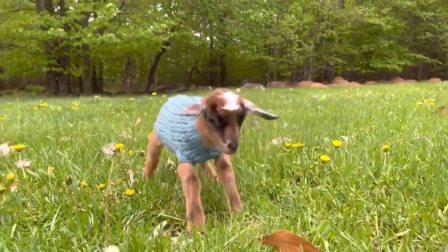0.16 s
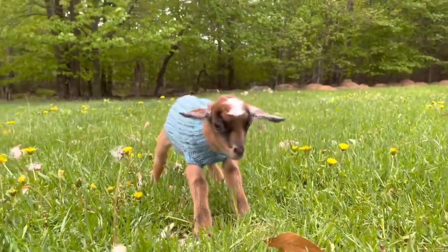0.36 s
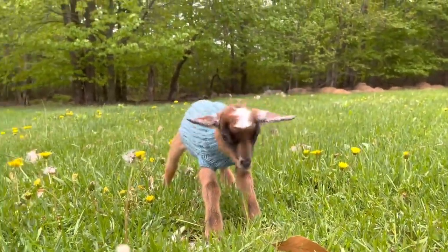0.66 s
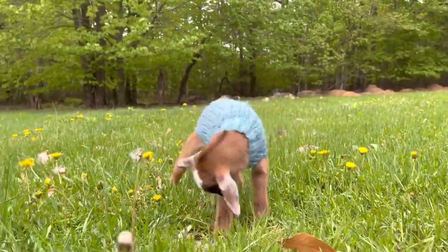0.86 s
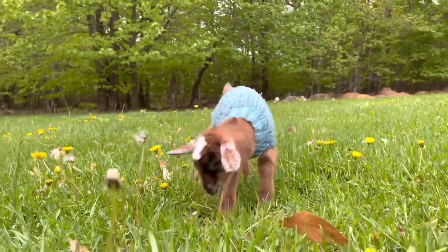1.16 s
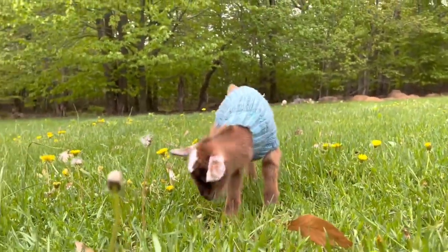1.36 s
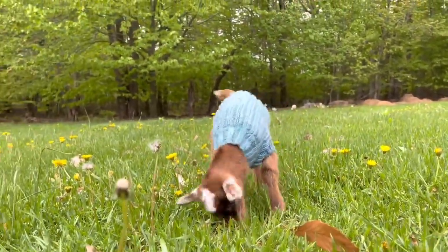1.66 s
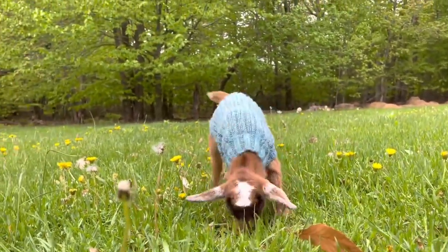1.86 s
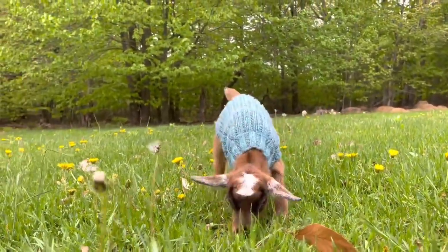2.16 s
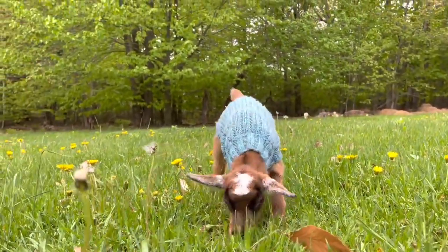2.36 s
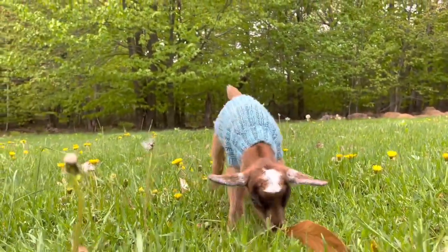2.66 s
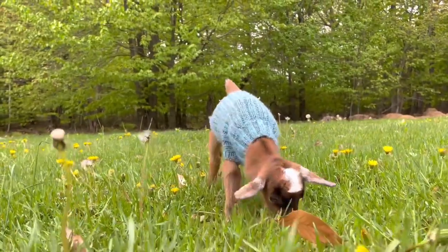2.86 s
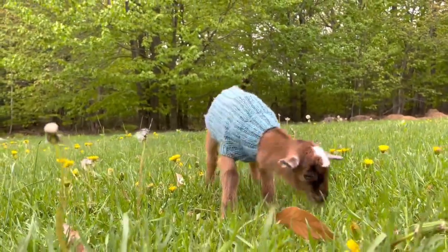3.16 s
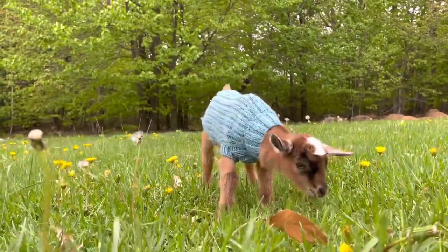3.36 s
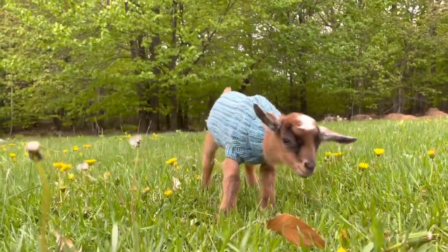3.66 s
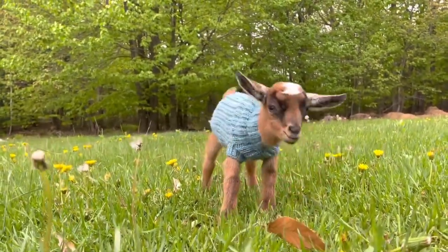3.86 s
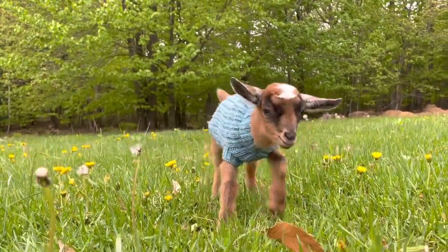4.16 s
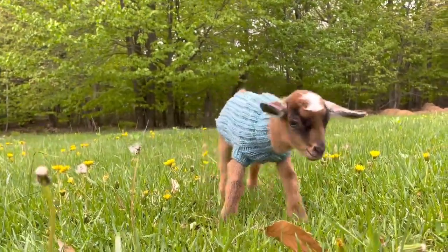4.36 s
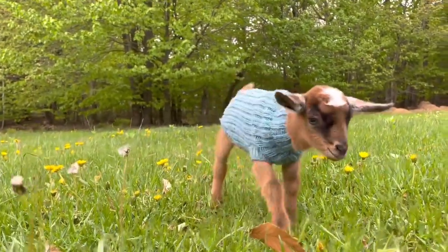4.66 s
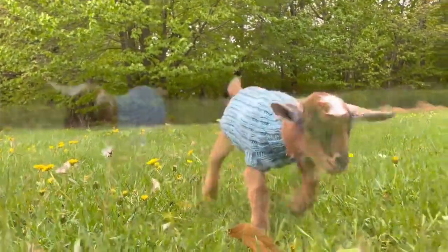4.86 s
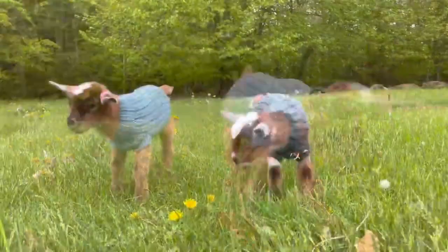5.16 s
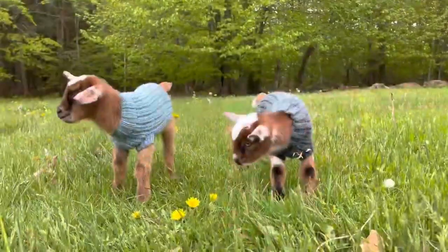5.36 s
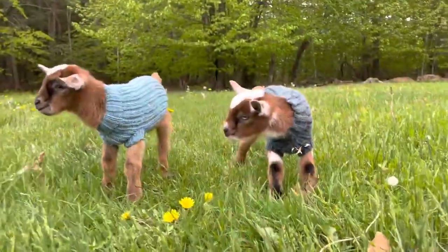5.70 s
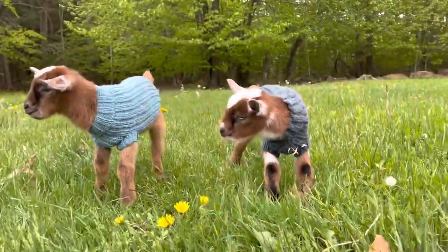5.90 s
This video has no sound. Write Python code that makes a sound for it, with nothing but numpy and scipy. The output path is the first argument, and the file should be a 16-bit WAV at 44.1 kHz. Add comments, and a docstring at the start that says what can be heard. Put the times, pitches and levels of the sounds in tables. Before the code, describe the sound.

A goat kid gives a small sneeze, then two quavering bleats, over soft grass rustle, distant birdsong and a faint low drone.

```python
"""A soft, thumping puff opens over a distant low drone: a newborn goat kid snuffles in a meadow.
Birds whistle at the wood's edge, grass ticks and rustles, and the kid sneezes through flapping nostrils.
It gives two close, quavering bleats, vocal-fold overtones shaped by a moving throat and roughened by
breath. Another kid holds a long, sagging call further off."""
import sys
import numpy as np
from scipy import signal
from scipy.fft import rfft, irfft, next_fast_len
from scipy.io import wavfile
from scipy.ndimage import uniform_filter1d, map_coordinates

SR = 44100
rng = np.random.default_rng(int(sys.argv[2]) if len(sys.argv) > 2 else 0)


def log_audio(samples):
    """Write samples as a 16-bit WAV file to the path given in sys.argv[1]."""
    # one column per channel
    frames = np.atleast_2d(samples).T
    # limit to full scale, then quantise
    limited = np.clip(frames, -1, 1)
    pcm = np.round(limited * 32767).astype(np.int16)
    wavfile.write(sys.argv[1], SR, pcm)


N = 266011
T = np.arange(N) / SR

# snuffles and brushed grass: t/s, rise/s, hold/s, level/dB, tilt/(dB/octave), thump gain/dB, thump f/Hz
PUFFS = [(0, 0.00035, .014, -39, 4, -36.5, 258), (.021, 0.0044, 0.067, -59.5, 3, -30, 88),
         (0.913, 0.0054, 0.027, -57.5, 3, -46, 200), (0.959, 0.019, 0.022, -57.5, 4, -56, 201),
         (2.051, .003, 0.027, -72.5, 2, -53, 650), (3.063, 0.00096, 0.084, -57.5, 2, -27, 183),
         (4.245, 0.0078, 0.016, -61, -0.5, -45, 354), (4.395, 0.0035, 0.021, -64.5, -0.5, -68, 410),
         (5.578, 0.031, .005, -50.5, 2.5, -54.5, 295), (5.616, 0.0024, 0.0055, -35, 2, -39, 703),
         (5.625, 0.0045, 0.016, -48, -0.5, -41, 337), (5.645, 0.0034, 0.0034, -41.5, 1, -54, 298),
         (5.704, 0.0047, 0.0066, -64, -3, -46.5, 418), (5.797, .012, 0.012, -56.5, 0, -43.5, 496)]
# colour of a puff before its tilt: f/Hz, level/dB
PUFF_SPECTRUM = [(240, -1), (400, 1), (796, -1.5), (860, 0.5), (1130, -2), (1470, -2), (4090, -9),
                 (8930, -9), (12300, -17.5), (13500, -36), (15500, -54)]
# fader rides for the drone and the grass hiss: t/s, level/dB
DRONE_RIDE = [(0, -43.5), (.15, -54.5), (2.0, -52.5), (3.1, -51), (4.1, -53.5), (4.89, -53.5), (5.19, -63),
              (5.5, -54), (5.6, -60), (6.03, -68)]
BREEZE_RIDE = [(.14, -82), (.27, -88.5), (.84, -88.5), (1.03, -78.5), (1.31, -82.5), (1.51, -88),
               (2.03, -81.5), (2.2, -85), (2.6, -85), (2.84, -76.5), (3.04, -81.5), (3.36, -88),
               (3.66, -77), (4.23, -69), (4.36, -70.5), (4.46, -86), (4.74, -67.5), (5.33, -69),
               (6.03, -64.5)]
# colours of grass hiss, leaf murmur and drone: f/Hz, level/dB
GRASS_SPECTRUM = [(1180, -9), (2000, -6), (2330, -4.5), (2670, -8.5), (3200, -6.5), (3440, -10.5),
                  (8980, -9), (10100, -14), (11500, -8), (13500, -87)]
LEAF_SPECTRUM = [(180, -4), (300, -4.5), (443, -7.5), (722, -7), (1850, -15.5), (2500, -32.5), (3250, -33),
                 (5500, -120)]
DRONE_SPECTRUM = [(12, -63), (20, -35.5), (57, 1), (107, 3), (159, -4.5), (188, -7.5), (220, -12.5),
                  (254, -15.5), (450, -25.5), (580, -35), (990, -120)]
# stereo image of the noise beds: f/Hz, left-right correlation
BED_CORRELATION = [(30, 0.8), (60, 1), (180, 0.85), (550, 0.26), (1650, -0.11), (4970, 0.55),
                   (15000, -0.54)]
# faint tones in the drone, perhaps a far engine: start t/s, end t/s, start f/Hz, end f/Hz, gain/dB
DRONE_TONES = [(0, 0.803, 178, 177.8, -69.5), (1.04, 1.4, 318, 321, -78.5),
               (2.138, 3.155, 213.5, 228.5, -64.5), (3.215, 3.85, 318, 324.4, -74.5),
               (3.284, 3.942, 358, 387, -72.5)]
# a far warbler: t/s, length/s, starting level/dB, f/Hz, warble depth/Hz
TRILLS = [(0, .62, -64, 2526, 236), (1.176, 0.72, -66, 2428, 71.2)]
# notes of three birds: t/s, length/s, start f/Hz, end f/Hz, gain/dB, left-right/dB
SLIDES = [(1.019, 0.056, 5530, 3360, -70, 4), (1.05, 0.049, 3150, 1920, -80.5, -17),
          (1.128, 0.055, 5030, 3670, -72.5, 0), (1.237, 0.057, 4870, 3430, -71, 2),
          (2.147, 0.049, 4590, 3040, -74.5, 8), (2.409, .05, 4960, 3390, -72, 12),
          (3.216, .053, 5440, 3480, -74, 12), (3.322, .054, 4930, 3430, -69.5, 11.5),
          (3.44, 0.06, 4850, 3560, -76.5, 13.5), (4.474, .042, 4920, 3400, -77.5, 8.5)]
DIVES = [(2.289, .058, 8360, 3790, -67, 7), (4.361, .044, 7130, 3670, -70.5, 12)]
CHIPS = [(.507, .038, 3370, 3220, -86, -10), (.588, 0.02, 3380, 3050, -73.5, -10),
         (1.129, 0.039, 3253, 3170, -72, -7), (1.639, 0.024, 3280, 3210, -81, -7),
         (1.712, .028, 3415, 3100, -71, -7)]
# pitch contours of slides, dives and chips: share held at the top, exponent of the fall
NOTE_SHAPES = [(.27, 1.05), (0.017, .85), (0.23, 1.15)]
# snapping grass stems: t/s, peak level/dB before panning, f/Hz, left-right/dB
STEM_TICKS = [(0.164, -53.5, 8800, 5), (2.369, -35, 4730, 3.5), (2.7806, -47.5, 11000, 7),
              (2.7935, -50, 7460, 8), (3.2424, -55, 4720, 11), (5.6189, -30, 8530, 3),
              (5.6224, -33, 8650, 6), (5.6307, -37, 8760, 1.5), (5.639, -39, 8610, 4),
              (5.678, -45, 5820, 6)]
# course of the sneeze: t/s, flap rate/Hz, whistle level/dB, thrum level/dB
SNEEZE = [(.85, 176, -72, -70), (.864, 237, -60, -63), (.878, 200, -43, -54), (.886, 335, -49, -42),
          (.892, 470, -40.5, -42.5), (.9, 453, -41, -34), (.916, 427, -46, -42), (.923, 375, -55, -49),
          (.935, 650, -78, -70)]
# a list per voiced phrase (first bleat, short pickup, second bleat), a row per quaver:
# trough t/s, f/Hz, level/dB, mouth opening; crest t/s, f/Hz, level/dB, mouth opening;
# pitch hold before the crest/s, hold after/s, mouth surge/dB, nose/dB, breath/dB
QUAVERS = [
    [(3.690, 441.4, -49.5, -0.83, 3.727, 636.6, -42, 0.85, 0.0011, 0.0027, 3.4, -9.5, -7.5),
     (3.806, 495, -72, 0.63, 3.847, 650, -39.5, 0.52, .015, .012, 8, -11, -16.5),
     (3.902, 461.5, -60, 0.65, 3.951, 672.5, -40.5, 0.48, 0.019, 0.015, 9.4, -15.5, -4),
     (3.997, 517.4, -54.5, 0.47, 4.046, 678.5, -36.5, 0.2, 0.013, 0.013, 5.6, -27, -17),
     (4.113, 406, -58, 0.37, 4.155, 515, -50, 0.3, 0.02, 0.0055, 1, -14.5, 0.5)],
    [(4.863, 568, -50.5, 0.28, 4.88, 589, -44, 0.34, 0.0029, .003, 0.36, -13.5, -1.5)],
    [(4.968, 630, -57.5, 0.48, 4.995, 670, -37, 0.067, 0.0173, 0.01005, 10.4, -16.5, -19.5),
     (5.041, 556.7, -48, .5, 5.081, 682.6, -37, 0.37, .019, 0.013, 9.7, -25, -19),
     (5.137, 515, -50.5, 0.61, 5.17, 662, -41, 0.56, .011, 0.011, 2, -33, -8),
     (5.224, 511, -54.5, 0.53, 5.252, 618, -46.5, 0.64, 0.0055, 0.0048, 0.43, -31, -8)],
]
# closing trough of each phrase: t/s, f/Hz, level/dB, mouth opening
PHRASE_ENDS = [(4.214, 402, -67.5, 0.18), (4.922, 432, -65, 0.47), (5.31, 446, -69.5, 0.45)]
# moving resonances of each phrase: t/s, middle f/Hz, gain/dB, upper f/Hz, gain/dB
VOWELS = [
    [(3.69, 3800, -4.5, 5800, -19.5), (3.728, 4480, 1.5, 6300, -6), (3.778, 5430, 14.5, 6350, 4.5),
     (3.815, 4940, 3, 5850, -4), (3.832, 5000, 9, 5900, 8), (3.845, 4950, 10, 5900, 8.5),
     (3.87, 4880, 11, 7400, 8), (3.93, 5130, 11, 6770, 7), (3.955, 4690, 13.5, 6670, 5),
     (3.961, 3870, -3, 6650, 0.5), (3.975, 4300, -3.5, 6550, 7.5), (4.0, 3880, 4, 5800, 4.5),
     (4.035, 4180, 2.5, 5370, -4), (4.078, 4070, 6, 5930, 4), (4.115, 4550, -14, 5970, -26),
     (4.14, 4550, -0.5, 6100, -14.5), (4.165, 4440, -3, 6080, -13.5), (4.19, 5190, 7.5, 6000, -2),
     (4.21, 5100, -17, 6250, -3)],
    [(4.86, 3680, 3.5, 5970, -15), (4.885, 3640, -1, 5970, -19), (4.915, 3850, -13, 6000, -22)],
    [(4.96, 4000, 0, 5850, -6), (4.995, 4130, 9.5, 5780, 14.5), (5.012, 3900, 10.5, 6300, 14.5),
     (5.045, 4100, 0.5, 5950, 6), (5.082, 4090, 14.5, 5920, 11), (5.105, 4100, 7, 6230, 9),
     (5.128, 4300, 3.5, 6230, 4), (5.15, 4330, -2, 6130, 6.5), (5.182, 4020, 9.5, 6340, 7),
     (5.208, 4500, -5, 6600, 3), (5.225, 4330, 2, 6200, 2), (5.255, 4350, -2, 6350, 1)],
]
# throat resonances that stay put: f/Hz, width/Hz, relative gain/dB
THROAT = [(2650, 1880, -4), (8720, 1000, -6), (10970, 310, -14.5)]
# side signal of a close voice between two microphone ports: f/Hz, level/dB
CLOSE_SIDE_SPECTRUM = [(400, -28), (1300, -10), (4400, -17.5), (8500, -4.5)]
# timbre of the far kid: harmonic number, relative level/dB
FAR_HARMONICS = [(1, -35), (2, 8.5), (3, -7), (4, 0), (5, 1), (6, -3.5), (7, 2.5), (8, 3), (9, -1),
                 (10, -4.5), (11, -28)]


def amp(db):
    return 10 ** (np.asarray(db) / 20)


def unit_rms(x):
    return x / np.sqrt(np.mean(x ** 2) + 1e-20)


def along(points, hz):
    """Read a curve on a log frequency axis."""
    f, values = np.transpose(points)
    return np.interp(np.log(hz + 1), np.log(f + 1), values)


def curves(rows, t=T, smooth=1):
    """One automation lane for each column after the time."""
    times, *columns = np.transpose(rows)
    return [uniform_filter1d(np.interp(t, times, c), size=smooth) for c in columns]


def wobble(rate):
    """A smooth random curve, rate knots a second."""
    return map_coordinates(rng.standard_normal(int(N * rate / SR) + 4), [T * rate])


def filtered(x, response):
    """EQ with a complex response of frequency."""
    size = next_fast_len(x.shape[-1] + 8192)
    return irfft(rfft(x, size) * response(np.fft.rfftfreq(size, 1 / SR)), size)[..., :x.shape[-1]]


def peak(f, hz, width):
    """One resonance, gain 1 at its centre."""
    return 1j * f * width / (hz * hz - f * f + 1j * f * width + 1e-9)


def panned(x, lr_db):
    return x * amp([[lr_db / 2], [-lr_db / 2]])


def scatter(x, t60, delay):
    """The diffuse stereo tail that trees or ground send back."""
    t = np.arange(SR) / SR
    tail = rng.standard_normal((2, SR)) * amp(-60 * t / t60) * (t > delay)
    return signal.fftconvolve(x[None], tail / np.linalg.norm(tail[0]), axes=1)[:, :N]


def noise_bed(spectrum, patchy_db):
    """Stereo noise of rms 1, mottled in time and frequency."""
    bins = signal.stft(rng.standard_normal((2, N)), nperseg=512)[2]
    patches = uniform_filter1d(rng.standard_normal(bins.shape[1:]), size=6, axis=0)
    patches = unit_rms(uniform_filter1d(patches, size=10, axis=1))
    pair = signal.istft(bins * amp(patchy_db * patches), nperseg=512)[1][:, :N]
    spread = lambda f: np.arccos(np.clip(along(BED_CORRELATION, f), -1, 1)) / 2
    mid, side = filtered(pair, lambda f: amp(along(spectrum, f)) * [np.cos(spread(f)), np.sin(spread(f))])
    return unit_rms(np.array([mid + side, mid - side]))


def puffs(longest_fall_s=0.034):
    """Breath and brushed grass: short gusts of grainy noise, each with a soft thump on the attack."""
    out = np.zeros((2, N + SR))
    t = np.arange(SR // 4) / SR
    for start, rise, hold, db, tilt_db, thump_db, thump_hz in PUFFS:
        attack = np.clip(t / rise, 0, 1) ** 2
        release = np.exp(-2 * np.clip(t - rise - hold, 0, 1) / min(hold, longest_fall_s))
        mid, side, grain = rng.standard_normal((3, len(t)))
        grain_db = 2.5 * unit_rms(uniform_filter1d(grain, size=60))
        air = np.array([mid + 0.76 * side, mid - 0.41 * side]) * amp(grain_db)
        colour = lambda f: amp(along(PUFF_SPECTRUM, f) + tilt_db * np.log2(f / 4000 + .01))
        gust = attack * release * unit_rms(filtered(air, colour))
        cycles = thump_hz * (t + 0.0013 * (1 - np.exp(-t / 0.0079)))  # starts a little sharp
        thump = t / 0.014 * np.exp(1 - t / 0.004) * np.sin(2 * np.pi * cycles)
        out[:, int(start * SR):][:, :len(t)] += amp(db) * gust + amp(thump_db) * thump
    return out[:, :N]


def meadow():
    """The bed: grass hiss and leaf murmur ride the breeze above a distant low drone."""
    breeze_db, = curves(BREEZE_RIDE)
    drone_db, = curves(DRONE_RIDE)
    leaves_db = -74 + 0.34 * (breeze_db + 82)  # leaves follow about a third of each swing
    grass = amp(breeze_db + 4.5 + 1.6 * wobble(21)) * noise_bed(GRASS_SPECTRUM, patchy_db=4.0)
    leaves = amp(leaves_db + 1.5 * wobble(4.3)) * noise_bed(LEAF_SPECTRUM, patchy_db=1.5)
    drone = amp(drone_db + 1.32 * wobble(7)) * noise_bed(DRONE_SPECTRUM, patchy_db=0.27)
    return grass + leaves + panned(drone, -1.1)


def drone_tones():
    """Thin, slightly unsteady hums that swell and fade inside the drone."""
    out = np.zeros(N)
    for start, end, start_hz, end_hz, db in DRONE_TONES:
        progress = np.clip((T - start) / (end - start), 0, 1)
        hz = start_hz + (end_hz - start_hz) * progress + 1.5 * wobble(21)
        swell = np.sqrt(abs(np.sin(np.pi * progress))) * (progress < 1)
        out += amp(db + 3.5 + 1.5 * wobble(6.5)) * swell * np.sin(2 * np.pi * np.cumsum(hz) / SR)
    return out


def birds(trill_fade_db_per_s=34):
    """Fading trills, and whistles that linger at the top, then slide down; the wood smears them."""
    whistles = np.zeros((2, N))
    for notes, (held, bend) in zip((SLIDES, DIVES, CHIPS), NOTE_SHAPES):
        for start, length, start_hz, end_hz, db, lr_db in notes:
            progress = np.arange(int(length * SR)) / (length * SR)
            fall = (np.clip(progress - held, 0, 1) / (1 - held)) ** bend
            hz = uniform_filter1d(start_hz * (end_hz / start_hz) ** fall, size=300, mode="nearest")
            envelope = np.sin(np.pi * progress) ** 0.44 * amp(db + 3.5 + 4.6 * wobble(138)[:len(hz)])
            note = envelope * np.sin(2 * np.pi * np.cumsum(hz) / SR)
            whistles[:, int(start * SR):][:, :len(note)] += panned(note, lr_db)
    trill = np.zeros(N)
    for start, length, db, hz, warble_hz in TRILLS:
        gate = (T >= start) * (T < start + length)
        level = amp(db - trill_fade_db_per_s * (T - start) + 0.93 * wobble(36.4))
        trill += gate * level * np.sin(2 * np.pi * np.cumsum(hz + warble_hz * wobble(60)) / SR)
    echo = amp(-2.5) * scatter(whistles.mean(axis=0), t60=0.96, delay=0.02)
    return whistles + echo + scatter(trill, t60=0.47, delay=0)


def stem_ticks(t60=0.0019):
    """Grass stems snap: a tiny noise burst rings for a few bright cycles."""
    out = np.zeros((2, N + SR))
    t = np.arange(400) / SR
    for start, db, hz, lr_db in STEM_TICKS:
        burst = rng.standard_normal(len(t)) * amp(-60 * t / t60)
        snap = filtered(burst, lambda f: peak(f, hz, 0.32 * hz) ** 2 * (f < 12500))
        out[:, int(start * SR):][:, :len(t)] += panned(amp(db) * snap / abs(snap).max(), lr_db)
    return out[:, :N]


def sneeze(nostril_hz=2970, climb_hz_per_s=26000, blast_s=.916, blast_db=-47.5):
    """The nostrils flap, gathering speed: each spurt of air rings the nose and pushes a low thrum."""
    start, end = SNEEZE[0][0], SNEEZE[-1][0]
    span = slice(int(start * SR), int(end * SR))
    t = T[span]
    flap_hz, whistle_db, thrum_db = curves(SNEEZE, t)
    nose_hz = nostril_hz + climb_hz_per_s * (np.minimum(t, blast_s) - start)  # the nostrils narrow
    flaps = np.cumsum(flap_hz * (1 + 0.033 * wobble(300)[span])) / SR
    since_flap = flaps % 1 / flap_hz
    spurt = amp(2 * rng.standard_normal(99))[flaps.astype(int)] * amp(-60 * since_flap / .006)
    nose_air, hiss_air = rng.standard_normal((2, len(t)))
    ring = spurt * (np.sin(2 * np.pi * nose_hz * since_flap) + .9 * nose_air)
    nose_eq = lambda f: peak(f, 2940, 1000) * peak(f, 4230, 2000) * peak(f, 2100, 2900)
    whistle = unit_rms(filtered(ring, nose_eq))
    phase = 2 * np.pi * flaps
    thrum = np.sin(phase) + 0.31 * np.sin(2 * phase + 1) + 0.095 * np.sin(phase / 2)
    hiss_eq = lambda f: (peak(f, 8700, 1500) ** 2 + 0.17 * peak(f, 6400, 5000)) * (f < 12300)
    hiss = unit_rms(filtered(hiss_air * (0.71 + spurt), hiss_eq))
    hiss_db = blast_db + np.minimum(635 * (t - blast_s), 2600 * (blast_s - t))  # builds, then cuts off
    flutter_db = 2.5 * wobble(200)[span]
    out = np.zeros(N)
    out[span] = amp(whistle_db) * whistle + amp(thrum_db + flutter_db) * thrum + amp(hiss_db) * hiss
    return out


def quavering(quavers, end, t, longest_glide_s=0.05, surge_s=0.0087, creep_hz_per_s=480):
    """Automation for the bleat: each quaver arches from a slack trough to a taut crest and back."""
    columns = np.transpose(quavers)
    slack_s, slack_hz, slack_db, slack_mouth = np.c_[columns[:len(end)], end]
    crest_s, crest_hz, crest_db, crest_mouth, hold_before, hold_after, *timbre = columns[len(end):]
    crest = np.clip(np.searchsorted(slack_s, t, side="right") - 1, 0, len(crest_s) - 1)
    since = t - crest_s[crest]
    falling = since > 0
    trough = crest + falling
    span = abs(slack_s[trough] - crest_s[crest])
    held = np.where(falling, hold_after[crest], hold_before[crest])
    away = np.clip(abs(since) / span, 0, 1)  # 0 at the crest, 1 in the trough
    glide = np.clip((abs(since) - held) / np.minimum(span - held, longest_glide_s), 0, 1)
    surge_db, nose_db, breath_db = (np.interp(t, crest_s, c) for c in timbre)
    surge_db = surge_db * np.exp(-(since / surge_s) ** 2)
    nose_db = nose_db + 7 * away  # the troughs turn nasal
    taut_hz = crest_hz[crest] + creep_hz_per_s * since - 3.5 * surge_db  # gives a little in the surge
    pitch = taut_hz + (slack_hz[trough] - taut_hz) * np.sin(np.pi / 2 * glide) ** 1.5
    db = crest_db[crest] + (slack_db[trough] - crest_db[crest]) * away ** np.where(falling, 1.25, 1.73)
    mouth = crest_mouth[crest] + (slack_mouth[trough] - crest_mouth[crest]) * away
    return uniform_filter1d([pitch, db, surge_db, nose_db, mouth, breath_db], size=7, axis=1)


def vocal_tract(f, t, vowel, mouth, surge_db):
    """Throat and mouth resonances; a wider mouth lifts the lowest from harmonic two to three."""
    middle_hz, middle_db, upper_hz, upper_db = curves(vowel, t, smooth=11)
    (throat_hz, throat_width, throat_db), *treble = THROAT
    band = peak(f, 1150 + 950 * np.clip(mouth, -.5, 1), 750) ** 2
    band -= amp(throat_db) * peak(f, throat_hz, throat_width) ** 2
    tract = amp(surge_db) * band / np.sqrt(np.sum(abs(band) ** 2, axis=0))
    tract += amp(middle_db) * peak(f, middle_hz, 740) ** 2 - amp(upper_db) * peak(f, upper_hz, 1000) ** 2
    tract += sum(amp(db + upper_db) * peak(f, hz, width) ** 2 for hz, width, db in treble)
    return tract * (1 - 0.58 * peak(f, 3320, 500))  # the nasal passage swallows a narrow band


def bleats(lead_in_s=.009, fade_s=0.0037, step=32):
    """Vocal-fold overtones pass through the moving throat; breath blurs the upper ones."""
    out = np.zeros(N)
    harmonic = np.arange(1, 25)[:, None]
    to_audio_rate = lambda x: uniform_filter1d(np.repeat(x, step, axis=-1), size=step, axis=-1)
    for quavers, end, vowel in zip(QUAVERS, PHRASE_ENDS, VOWELS):
        first, last = int((quavers[0][0] - lead_in_s) * SR), int(end[0] * SR)
        t = T[first:last:step]
        pitch, db, surge_db, nose_db, mouth, breath_db = quavering(quavers, end, t)
        f = harmonic * pitch
        partials = vocal_tract(f, t, vowel, mouth, surge_db)
        partials[0] = amp(nose_db)  # the nose carries the fundamental
        air = rng.standard_normal(f.shape) + 1j * rng.standard_normal(f.shape)
        leak_db = .055 * (640 - pitch)  # slack, low-pitched folds close badly and let more air through
        breath = amp(breath_db + leak_db) * uniform_filter1d(air, size=2, axis=1) * (f / 7000) ** 1.6
        partials *= (1 + breath) * (f < 12300)
        jitter, shimmer = uniform_filter1d(rng.standard_normal((2, len(t))), size=4, axis=1)
        phase = 2 * np.pi * np.cumsum(to_audio_rate(pitch * (1 + .006 * jitter))) / SR
        voice = np.sum(np.real(to_audio_rate(partials) * np.exp(1j * harmonic * phase)), axis=0)
        fade = np.clip(np.minimum(t - t[0], t[-1] - t) / fade_s, 0, 1)
        out[first:][:len(voice)] = -np.sqrt(2) * to_audio_rate(fade * amp(db + 1.5 * shimmer)) * voice
    return out


def far_call(start=5, end=6, hz=752, sag_hz=50, db=-58, fade_db_per_s=12, attack_s=.07, release_s=0.155):
    """Another kid holds one long note that fades and sags, mostly near its end."""
    swell = np.clip(np.minimum((T - start) / attack_s, (end - T) / release_s), 0, 1)
    pitch = hz - sag_hz * np.clip((T - start) / (end - start), 0, 1) ** 2.2
    phase = 2 * np.pi * np.cumsum(pitch * (1 + 0.0032 * wobble(60))) / SR
    narrow_db = -7 * np.clip((T - 5.37) / 0.022, 0, 1)  # the mouth narrows and harmonic two drops
    voice = sum(amp(level + (k == 2) * narrow_db + 4.5 * wobble(35)) * np.sin(k * phase + k * k)
                for k, level in FAR_HARMONICS)
    return amp(db - fade_db_per_s * (T - start)) * swell ** 2 * unit_rms(voice)


def scene():
    """The mix: one kid up front with a ground bounce, the other washed by the trees, meadow all round."""
    kid = bleats()
    far_kid = far_call()
    ground = amp(-13) * scatter(kid, t60=.03, delay=.001)
    side_phase = lambda f: np.pi * (1 - .5 * np.clip(f / 3000, 0, 1))  # the treble widens by phase only
    side = filtered(kid, lambda f: amp(along(CLOSE_SIDE_SPECTRUM, f)) * np.exp(1j * side_phase(f)))
    near = panned(kid, -0.92) + side * [[1], [-1]] + ground + panned(sneeze(), -3.1)
    far = panned(far_kid, -0.67) + amp(1) * scatter(far_kid, t60=0.34, delay=0.0065)
    return near + far + puffs() + stem_ticks() + birds() + drone_tones() + meadow()


def record(dry):
    """A brick-wall low-pass trims the very top."""
    return filtered(dry, lambda hz: hz < 16290)


dry = scene()
out = record(dry)
log_audio(out)
```